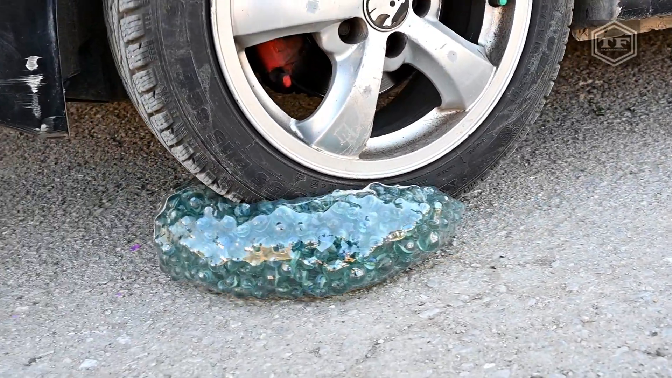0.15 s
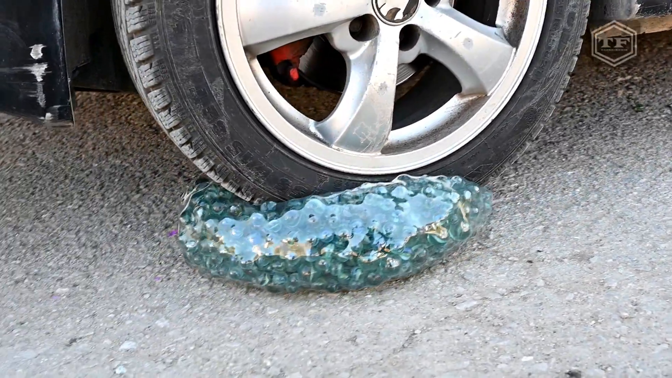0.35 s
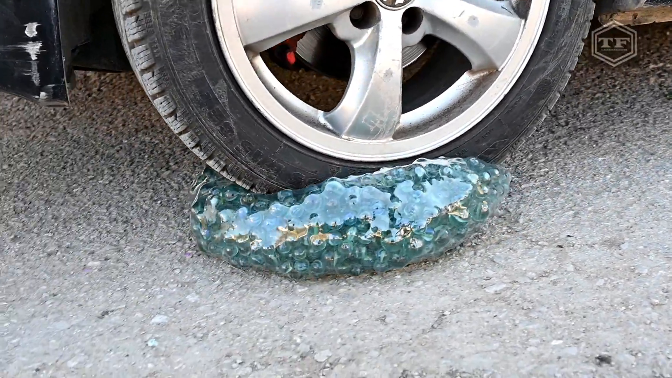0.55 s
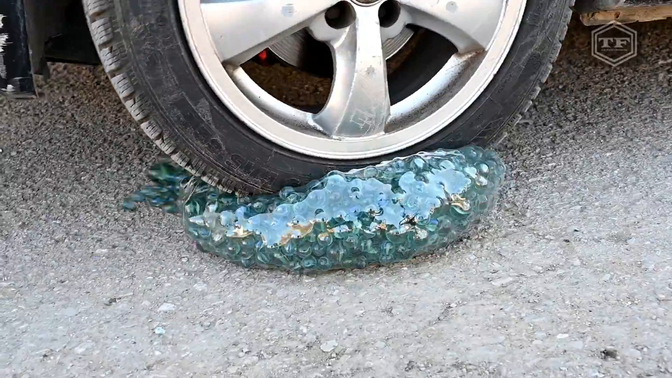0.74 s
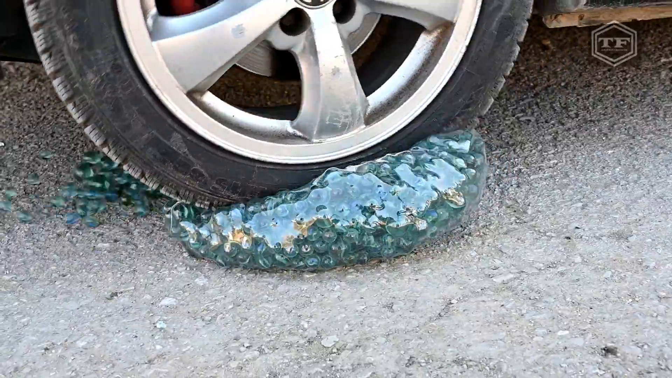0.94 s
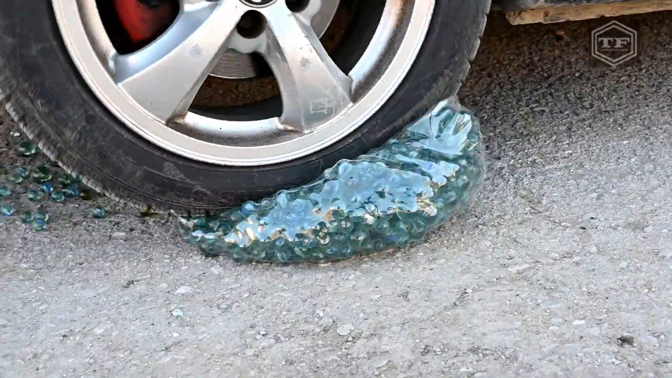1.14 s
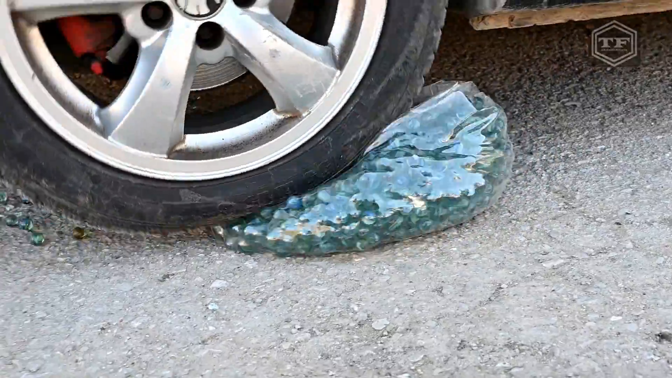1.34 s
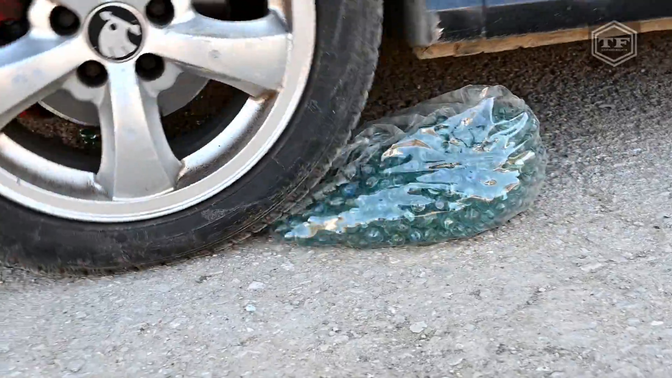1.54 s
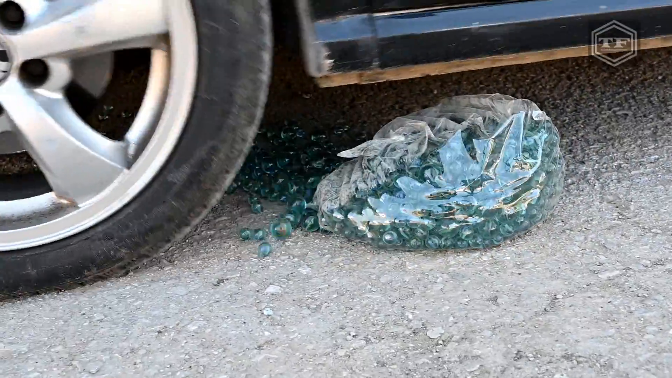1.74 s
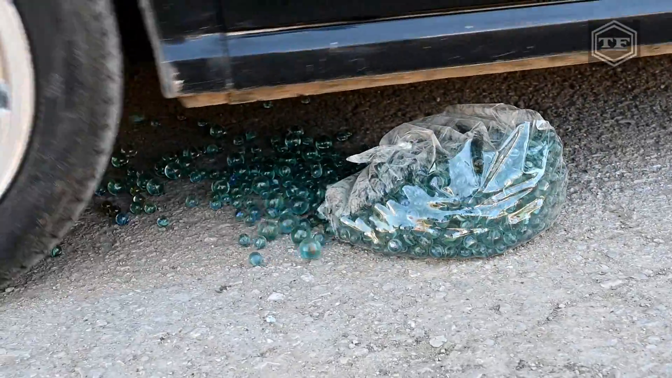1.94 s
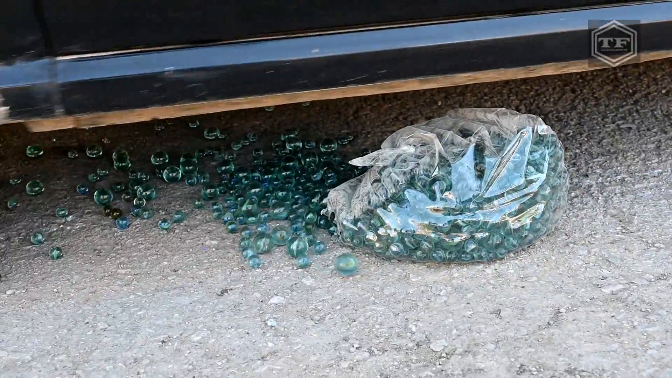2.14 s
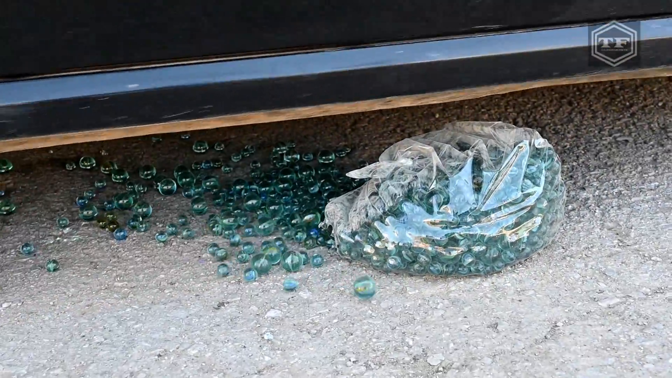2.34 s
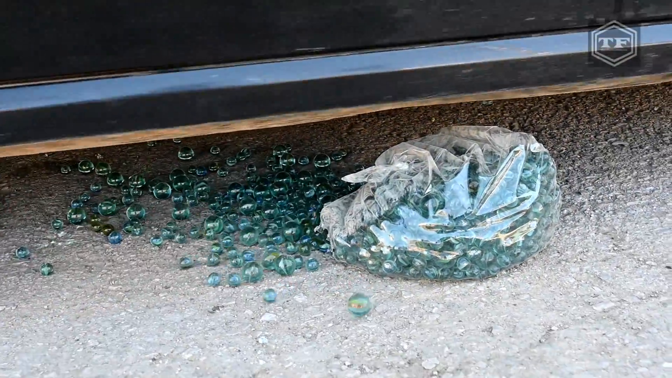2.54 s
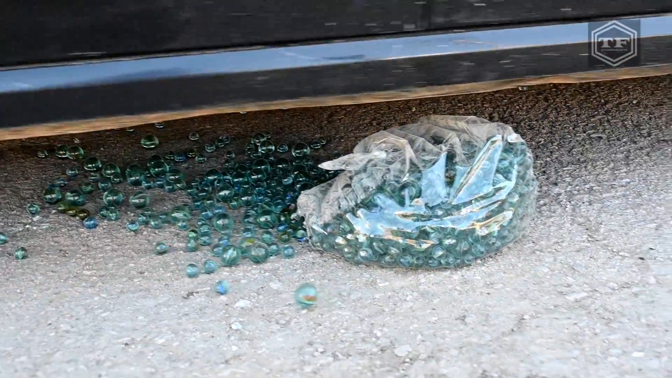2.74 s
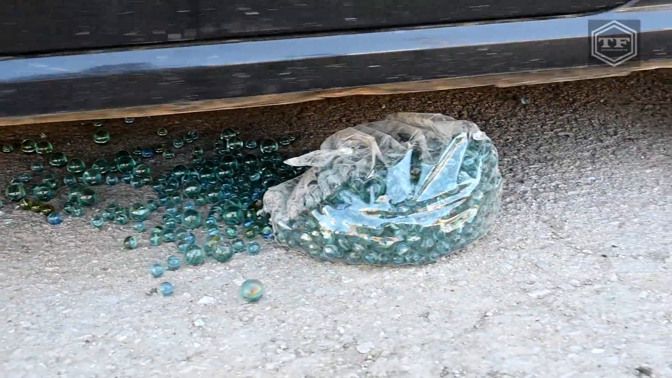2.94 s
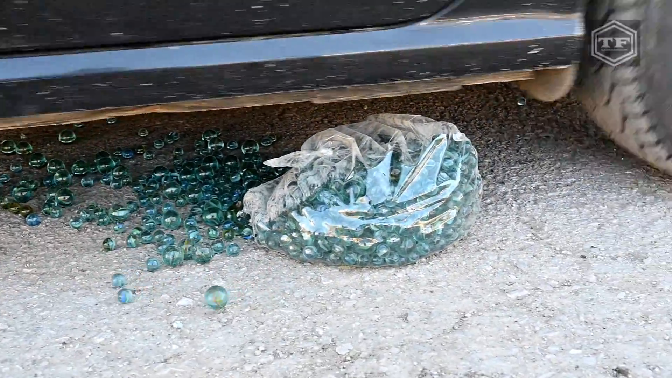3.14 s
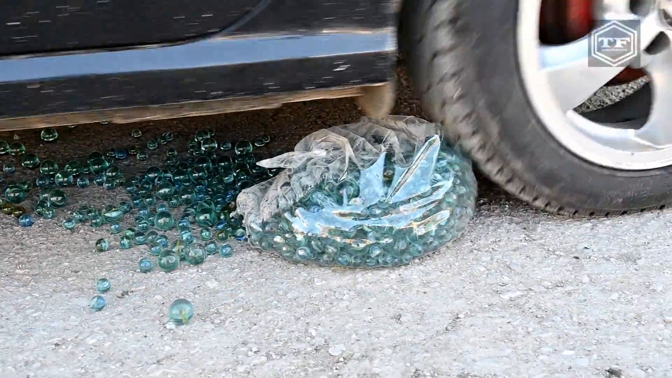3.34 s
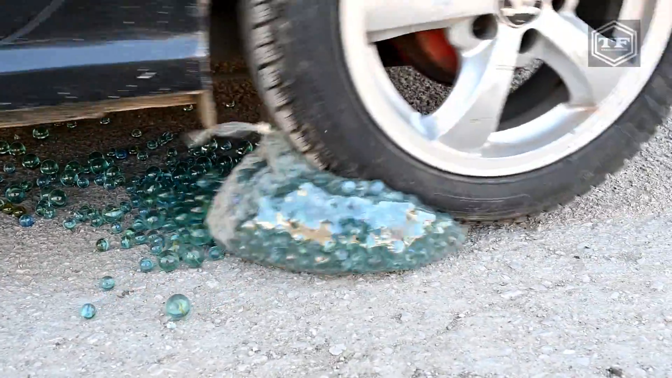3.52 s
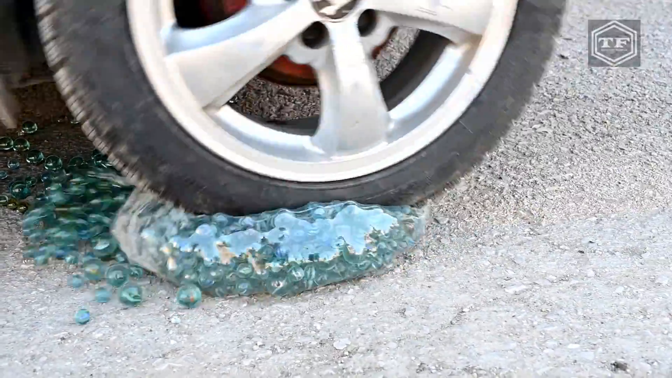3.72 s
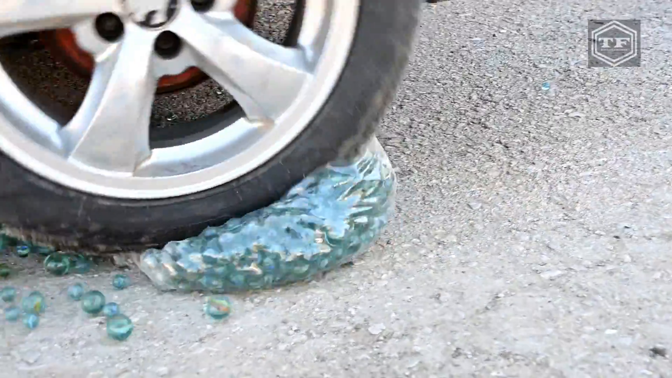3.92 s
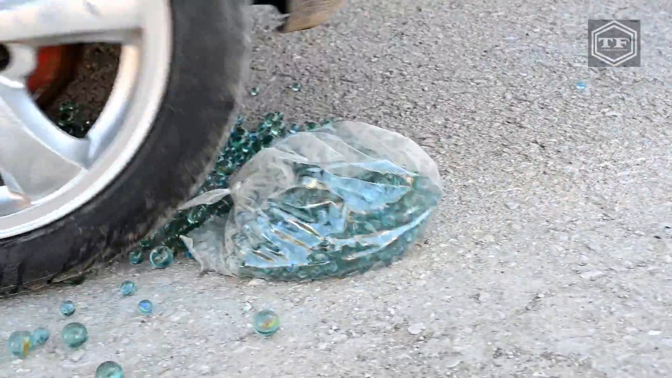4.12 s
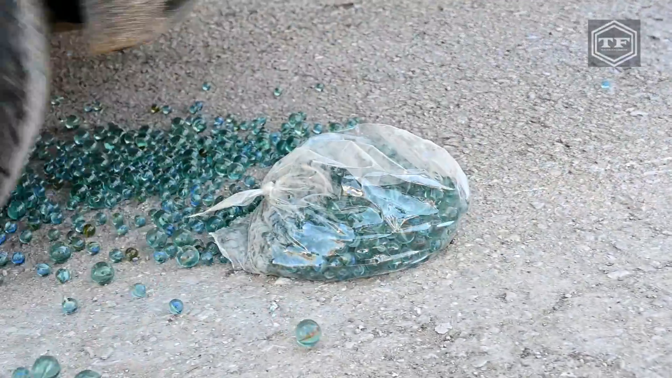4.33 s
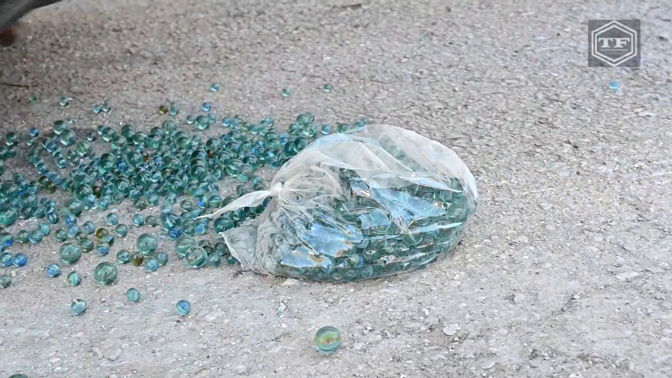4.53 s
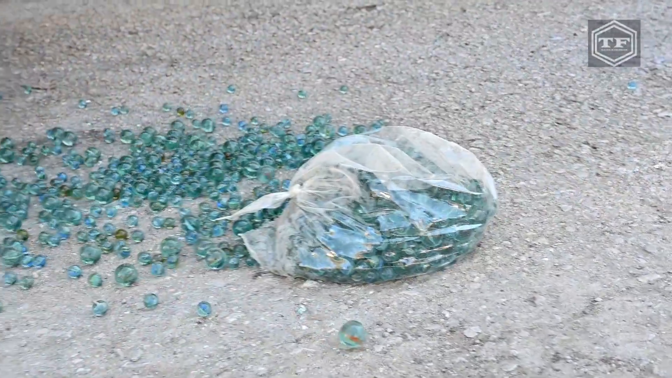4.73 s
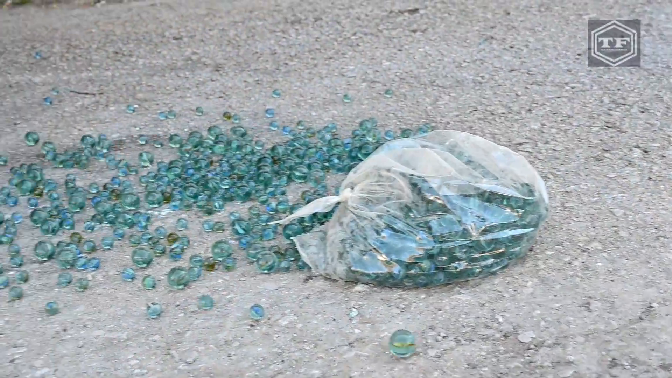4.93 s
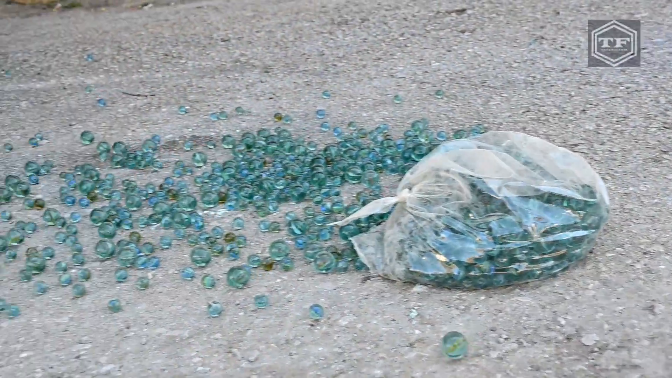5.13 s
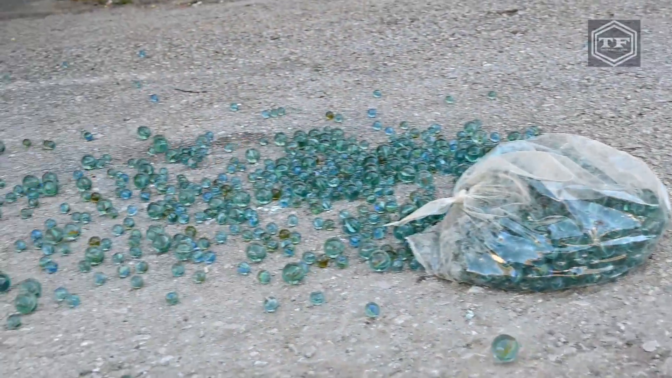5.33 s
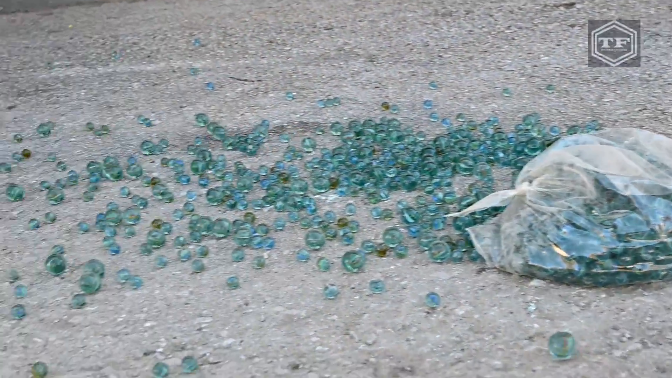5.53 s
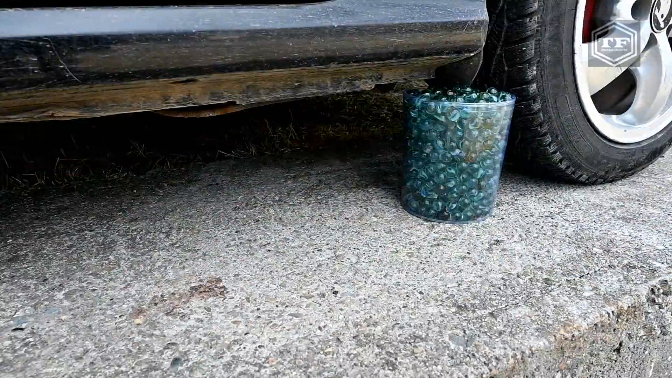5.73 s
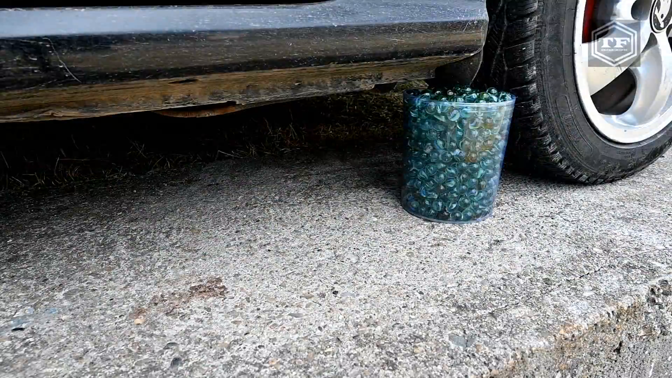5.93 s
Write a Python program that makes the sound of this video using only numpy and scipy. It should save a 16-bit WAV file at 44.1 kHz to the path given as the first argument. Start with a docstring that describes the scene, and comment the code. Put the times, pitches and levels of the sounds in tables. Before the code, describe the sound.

Close on outdoor pavement, a car's front tyre squeezes a bag of glass marbles with rising, uneven clatter and gritty grinding. It bursts into loud cracks, then marbles scatter and roll. After a quieter gap with low engine rumble, the rear tyre crushes it even louder, with distorted peaks and hollow knocks. Loose marbles click and die away, then the level drops to faint air.

```python
"""Car crushing a bag of marbles

A car rolls over a plastic bag of glass marbles on pavement, heard close by: engine rumble is shaped noise plus a hum.
Random impacts make the clatter, grinding and rolling; the front tyre squeezes the pack in slips until marbles spill.
The rear tyre bursts through it, and the loudest peaks clip. Loose marbles click, and decaying tones knock on the car.
The marbles die down, drifting left and then almost all the way back. Near the end the level drops quickly,
leaving faint air noise, a trace of engine rumble and a soft scuff.
"""
import sys
import numpy as np
from scipy import signal
from scipy.fft import rfft, irfft, next_fast_len
from scipy.io import wavfile
from scipy.ndimage import map_coordinates

SR = 44100
rng = np.random.default_rng(int(sys.argv[2]) if len(sys.argv) > 2 else 0)


def output_pcm(signal):
    """Save a mono or channel-first signal as 16-bit PCM at the path in sys.argv[1].

    Samples are clipped to [-1, 1] before scaling.
    """
    pcm = np.clip(np.atleast_2d(signal).T, -1, 1) * 32767
    wavfile.write(sys.argv[1], SR, np.round(pcm).astype(np.int16))


N = 267687
TIME = np.arange(N) / SR  # seconds
TOP_HZ = 15800  # middle of the final treble cutoff
LEVEL_DROP_S = 5.80  # end of the short fade that takes the level down

# All levels in the tables are relative; in the spectra only the shape counts.
# The pack gives way in a rush of contacts: start_s, level_db, grinding_db (added to level_db), t60_s
SLIPS = [(0.1884, -5.5, -13, 0.14), (0.3242, -5.5, -6, 0.15), (0.4394, -3.5, -5, 0.14),
         (0.6184, -1, -7, 0.15), (0.7044, 2, -18.5, 0.62), (0.8564, 7.5, -19, 0.26), (1.058, 6, -23, 0.032),
         (1.1398, -1, -14, 0.04), (1.2925, 8, -8.5, 0.084), (1.334, 2.5, -11.5, 0.099),
         (1.3848, 5.5, -8.5, 0.061), (1.4287, 10.5, -14, 0.13), (1.445, 14, -12, .06),
         (1.466, 3, -13, 0.068), (1.6064, 0, -16.5, 0.35), (1.6654, -4, -20.5, 0.16),
         (2.0113, -9.5, -22, .1), (2.2074, -16, -25, 0.049), (2.278, -11.5, -22, 0.043),
         (2.3025, -16, -25, 0.089), (2.4783, -13.5, -25, 0.047), (2.5574, -16.5, -13, 0.063),
         (2.7282, -22, -18, 0.064), (3.9486, 9.5, -11, 0.1)]
# Single glass clicks, loud and faint, at set times: start_s, level_db, pitch_hz, chatter_t60_s
COLLISIONS = [(0.0753, 3, 3600, 0.0069), (0.605, -4, 6500, .012), (1.1402, 2, 6150, 0.031),
              (1.8785, -0.5, 9200, 0.0076), (2.3365, -11.5, 7500, .035), (2.382, -12, 8040, 0.025),
              (2.5307, -11, 6100, 0.014), (2.6205, -12, 9600, .027), (2.651, -15.5, 7540, 0.028),
              (2.6839, -16.5, 6750, .02), (2.7065, -24, 2000, 0.0082), (2.8505, -28, 9000, 0.033),
              (3.0707, -23.5, 5650, 0.02), (4.4083, 6, 10800, 0.025), (4.9245, -19, 6440, 0.021),
              (5.0085, -20, 6360, 0.0077), (5.2349, -20, 6000, .012), (5.5085, -13, 5470, 0.01),
              (5.5345, -26, 1500, .008), (5.6095, -20, 11000, 0.006), (5.6514, -16.5, 1890, 0.0098),
              (5.7268, -24, 2400, 0.0053), (5.7577, -15.5, 2310, 0.0084), (5.8642, -42, 1310, 0.011)]
# Dull knocks on tyre and underbody: start_s, level_db, centre_hz
KNOCKS = [(1.2971, -10.5, 524), (1.4322, 2, 299), (1.7515, -20, 630), (1.8212, -11, 820),
          (1.8726, -25, 700), (1.9378, -20, 400), (2.0008, -16, 840), (2.0127, -17, 907),
          (2.0973, -22.5, 940), (3.2326, -23, 1010), (3.5995, -2.5, 616), (4.059, 1.5, 339),
          (4.1267, -11.5, 340), (4.3046, -3, 670), (4.4076, -12.5, 1130), (4.4812, -6.5, 904),
          (4.503, -14.5, 300), (6.0233, -36.5, 297)]
# Ringing modes of the car: pitch_hz, level_db, t60_s
CAR_MODES = [(144, 7.5, 0.041), (270.3, -7, 0.17), (479, -1, 0.039), (558, 2, 0.022), (660, -1.5, 0.043),
             (830, -1.5, 0.039), (1026, 6, 0.021), (1215, -4, .03), (2450, 2, .02)]
# A tyre drops as the bag gives way: start_s, cavity_ring_db, thump_db
TYRE_DROPS = [(1.298, -41, -15.5), (1.433, -32, -19), (3.601, -43.5, -14), (4.059, -30.5, -33)]
# Each tyre's crossing, front then rear: bite_s, top_s, leave_s, bite_db, top_db, leave_db (clatter),
# spill_db, spill_dies_db_per_s, spill_treble_db
PASSES = [(-0.01, 0.88, 1.47, -25, -16, -16.5, -17, 24, 2.5),
          (3.423, 3.78, 4.103, -5, -5.5, -12.5, -22, 19, 1.5)]
# Direction of the marbles: time_s, left_ear_lead_samples
DIRECTION = [(4.0, 0.51), (5.2, 5.96), (5.8, 0.76)]
# Engine loudness over time: time_s, level_db
THROTTLE = [(0, -40), (1.6, -39), (2.1, -33.5), (2.6, -43), (2.95, -37.5), (3.4, -37), (4.6, -32),
            (5.7, -45.5)]
# Spectrum of glass on glass: pitch_hz, level_db (per Hz)
GLASS_SPECTRUM = [(820, -40.5), (1400, -2), (1520, -15.5), (1640, -6), (1930, -15.5), (2410, -6.5),
                  (3820, -3), (4490, -4.5), (5710, 1), (7350, -3), (8370, -1), (9930, -5), (11200, -6),
                  (15400, -15)]
# Spectrum of marbles grinding under the tyre: pitch_hz, level_db (per Hz)
GRINDING_SPECTRUM = [(50, -31), (90, -3), (140, -3), (200, -1.5), (240, -1.5), (350, -8), (480, 1.5),
                     (700, -4), (860, 0.5), (1080, -3.5), (1280, -0.5), (1600, -11), (2400, -9.5),
                     (5000, -50)]
# Spectrum of marbles rolling on pavement: pitch_hz, level_db (per Hz)
ROLLING_SPECTRUM = [(100, -4.5), (220, 3.5), (350, -5.5), (480, -1.5), (750, -2), (1000, 1.5), (1270, 1),
                    (1650, -3.5), (3000, -2), (6000, -10), (11000, -21.5), (15500, -17.5)]
# Spectrum of the engine rumble: pitch_hz, level_db (per Hz)
ENGINE_SPECTRUM = [(12, -19), (22, 2), (30, 8.5), (45, -6.5), (60, -6.5), (85, -9), (120, -20.5),
                   (200, -17), (320, -43.5)]
# Spectrum of a tyre rumbling under load: pitch_hz, level_db (per Hz)
TYRE_SPECTRUM = [(15, -12.5), (30, -1.5), (55, 0), (80, 3), (120, -12), (250, -27.5)]
# Spectrum of the outdoor air noise: pitch_hz, level_db (per Hz)
AIR_SPECTRUM = [(25, 1.5), (100, -11), (250, -11.5), (700, -19), (1250, -24), (2500, -30.5), (15000, -42)]

BITE_S, SPILL_RISE_S = 0.009, 0.19  # rise as a tyre bites; rise of the spill before it leaves the pack
RELEASE_DB_PER_S, GRIND_RELEASE_DB_PER_S = 66.5, 108.5  # clatter and grinding once off the pack
GRIND_DB, GRIND_GROWS = -16, 0.59  # grinding at full-scale clatter; its dB per dB of clatter
SPILL_GRIND_DB, TYRE_GRIND_DB = -16, -54.5  # scrape of loose marbles re spill; tyres on bare pavement
PACK_TREBLE_DB, WRAP_TREBLE_DB = -2.5, -7.5  # treble of the pack; change through the whole bag
DULL_DB_PER_S = 3.5  # the spill dulls as it slows
CONTACTS_PER_S, CONTACTS_GROW = 22000, 0.52  # rate at full-scale clatter; its power of clatter strength
ROLL_DB, ROLL_SPILL_DB, ROLL_FOLLOWS = -47.5, -17, 0.55  # grit floor; full-scale spill; dB per dB of spill
FEW_ROLL_DB = -6.5  # the first, smaller spill rolls more quietly
STRAYS_PER_S, STRAY_DB, STRAY_FOLLOWS = 30, 1, 0.77  # level at full-scale clatter; dB per dB of clatter
STRAY_SPREAD_DB, STRAY_HZ, STRAY_CHATTER_S = 5, 7000, 0.036  # scatter in size; usual pitch; chatter t60
STRAY_OCTAVES_PER_DB = 0.09  # strays tick lower as the heap dulls
HEAVE_DB, HEAVE_S = -27, 0.04  # rumble at the peak after one drop; time to that peak


def amp(db):
    """Turn decibels into gain."""
    return 10 ** (np.asarray(db) / 20)


def level_db(gain):
    """Turn gain into decibels."""
    return 20 * np.log10(gain + 1e-6)


def unit(x):
    """Scale to an average (rms) strength of 1."""
    return x / np.sqrt(np.mean(x ** 2) + 1e-20)


def fade(t, t60):
    """Die away by 60 dB in t60 seconds."""
    return np.exp(-np.log(1000) * t / t60)


def along(points, hz):
    """Read a spectrum at any pitch, with pitch on a log axis."""
    f, v = np.transpose(points)
    return np.interp(np.log(hz + 1), np.log(f + 1), v)


def curves(rows):
    """Join each column after the time by straight lines, one value per sample."""
    s, *cols = np.transpose(rows)
    return [np.interp(TIME, s, c) for c in cols]


def wobble(rate):
    """Make a smooth random curve, with rate random points a second."""
    return map_coordinates(rng.standard_normal(4096), [TIME * rate], mode="wrap")


def add(track, s, sound):
    """Mix a sound into a track from time s on, cutting what runs past the end."""
    part = track[..., max(round(s * SR), 0):][..., :sound.shape[-1]]
    part += sound[..., :part.shape[-1]]


def coloured(x, spectrum, size=8192):
    """Give a sound the spectrum's tone without ringing ahead of it; the filter has unit power gain."""
    floored_db = np.maximum(along(spectrum, np.fft.rfftfreq(size, 1 / SR)), -100)
    cepstrum = irfft(np.log(amp(floored_db)))
    # keeping one side of the cepstrum makes the filter respond only after its input
    index = np.arange(size)
    one_sided = 2 * cepstrum * (index < size // 2) * (index > 0)
    response = irfft(np.exp(rfft(one_sided)))
    return signal.fftconvolve(x, response[None] / np.linalg.norm(response), axes=1)[:, :N]


def rush(spectrum, side_db):
    """Make stereo noise whose shared middle has rms near 1 and whose sides differ by side_db."""
    mid, side = coloured(rng.standard_normal((2, N)), spectrum)
    return mid + amp(side_db) * np.array([side, -side])


def contacts(rate, lead, scatter_db, spread):
    """Scatter random impacts of rms near 1; a delay between the ears gives each its own direction."""
    at = np.flatnonzero(rng.random(N) < rate / SR)
    size = unit(amp(scatter_db * np.clip(rng.standard_normal(N), -2, 2))[at])
    size = size * np.sqrt(SR / rate[at])  # rarer impacts are larger
    size = size * np.sign(rng.random(N) - 0.5)[at]
    late = np.rint(lead + spread * rng.standard_normal(N)).astype(int)[at]
    left = np.bincount(at, size, N)
    right = np.bincount(np.clip(at + late, 0, N - 1), size, N)
    return np.array([left, right])


def late_fade(fade_s=0.052):
    """A gain of 1 that falls to 0 in a short straight fade ending at LEVEL_DROP_S."""
    return np.clip((LEVEL_DROP_S - TIME) / fade_s, 0, 1)


def engine(firing_hz=29, hum_db=-12, side_db=-19, floor_db=-59):
    """Low exhaust rumble from shaped noise, with an unsteady firing note near idle."""
    hum_hz = firing_hz * (1 + 0.045 * wobble(5))
    hum = np.sin(2 * np.pi * np.cumsum(hum_hz) / SR)
    loudness = amp(curves(THROTTLE)[0]) * late_fade() + amp(floor_db)
    return loudness * (rush(ENGINE_SPECTRUM, side_db) + amp(hum_db) * hum)


def tyres(load, load_db=-25, load_grows=2.9, lag_s=0.06, side_db=-20):
    """A tyre rumbles as it labours over the pack, and heaves after each drop."""
    # the car's weight follows a moment later
    weight = signal.lfilter([1], [1, -np.exp(-1 / (lag_s * SR))], load)
    labour = amp(load_db) * (weight / weight.max()) ** load_grows
    since = np.maximum(TIME - np.array(TYRE_DROPS)[:, :1], 0) / HEAVE_S
    heave = amp(HEAVE_DB) * np.sum(since * np.exp(1 - since), axis=0)
    return np.hypot(labour, heave) * rush(TYRE_SPECTRUM, side_db)


def outdoor_air():
    """A faint, steady outdoor hush of shaped stereo noise."""
    return amp(-61) * rush(AIR_SPECTRUM, side_db=-4.5)


def crush():
    """Each tyre bites, climbs and leaves the pack; spilt marbles slow down and dull.

    Gives the strengths of clatter, its treble, grinding and spill."""
    power = np.zeros((4, N))
    # the front tyre tears the bag ever wider, letting more treble out
    wrap_db = np.interp(TIME, [0, PASSES[0][2]], [WRAP_TREBLE_DB, 0])
    for bite, top, leave, bite_db, top_db, leave_db, spill_db, dies, bright_db in PASSES:
        load_db = np.interp(TIME, [bite, top, leave], [bite_db, top_db, leave_db])
        touching = np.clip((TIME - bite) / BITE_S, 0, 1)
        after = np.maximum(TIME - leave, 0)
        pack = touching * amp(load_db - RELEASE_DB_PER_S * after)
        spill = np.clip(1 + (TIME - leave) / SPILL_RISE_S, 0, 1) * amp(spill_db - dies * after)
        pack_treble = pack * amp(PACK_TREBLE_DB + wrap_db)
        spill_treble = spill * amp(bright_db - DULL_DB_PER_S * after)
        grind = touching * amp(GRIND_DB + GRIND_GROWS * load_db - GRIND_RELEASE_DB_PER_S * after)
        power += np.square([np.hypot(pack, spill), np.hypot(pack_treble, spill_treble), grind, spill])
    return np.sqrt(power)


def clatter(strength, treble_db, rate, lead, count=10, q=3.0):
    """Glass on glass: each contact rings a tick of a few cycles in one of several pitch bands."""
    ticks = np.zeros((2, N))
    for hz in np.geomspace(1900, 14000, count):
        # octaves above 5500 Hz, where the treble setting acts
        hardness = np.clip(np.log2(hz / 5500), 0, 1.3)
        train = contacts(rate / count, lead, scatter_db=-0.5, spread=0.9)
        train = train * strength * amp(hardness * (treble_db + 4.5))
        ticks += signal.lfilter(*signal.iirpeak(hz, q, SR), train)
    return amp(-2.0) * coloured(ticks, GLASS_SPECTRUM)


def grinding(strength, rate, lead):
    """Loaded marbles scrape and jolt between rubber and pavement as shaped random impacts."""
    jolts = strength * contacts(0.3 * rate, lead, scatter_db=1.0, spread=2.5)
    return amp(1.5) * coloured(jolts, GRINDING_SPECTRUM)


def rolling(spill, lead, grit_rate=3500):
    """Whatever rolls keeps tapping the grit; the rear tyre sets many more marbles rolling."""
    taps = contacts(np.full(N, grit_rate), lead, scatter_db=5.0, spread=4.4)
    crowd_db = np.where(TIME < PASSES[1][0], FEW_ROLL_DB, 0)
    marbles = amp(ROLL_SPILL_DB + crowd_db) * spill ** ROLL_FOLLOWS
    return np.hypot(amp(ROLL_DB), marbles) * coloured(taps, ROLLING_SPECTRUM)


def strays(glass_db, treble_db, octaves=0.22, count=400):
    """Draw chance collisions that follow the heap's loudness and treble, as rows like COLLISIONS."""
    times = np.cumsum(rng.exponential(1 / STRAYS_PER_S, count))
    size, pitch = np.clip(rng.standard_normal((2, count)), -2, 2)
    db = STRAY_DB + STRAY_FOLLOWS * np.interp(times, TIME, glass_db) + STRAY_SPREAD_DB * size
    shift = octaves * pitch + STRAY_OCTAVES_PER_DB * np.interp(times, TIME, treble_db)
    hz = np.minimum(STRAY_HZ * 2 ** shift, TOP_HZ)
    return np.transpose([times, db, hz, np.full(count, STRAY_CHATTER_S)])[times < LEVEL_DROP_S]


def clicks(collisions, lead, cycles=0.56, crack_db=-11, crack_hz=5500, crack_t60=0.003, chatter_db=-11):
    """A single hard tick, with a short chatter of the neighbours that it jostles."""
    out, t = np.zeros((2, N)), TIME[:SR // 20]
    for s, db, hz, chatter_t60 in collisions:
        tick = np.sin(2 * np.pi * hz * t) * np.exp(-t * hz / cycles)
        # the instant of contact adds a burst of noise, softened above crack_hz
        burst = rng.standard_normal(len(t)) * fade(t, crack_t60)
        crack = signal.lfilter(*signal.butter(1, crack_hz, fs=SR), burst)
        tick += amp(crack_db) * np.linalg.norm(tick) * crack
        # so small a body radiates little below its own pitch
        tick = signal.lfilter(*signal.butter(2, hz / 2, "highpass", fs=SR), tick)
        jostle = rng.standard_normal((2, len(t))) * amp(chatter_db) * fade(t, chatter_t60)
        chatter = signal.fftconvolve(jostle, tick[None] / np.linalg.norm(tick), axes=1)
        sound = tick + chatter[:, :len(t)]
        add(out[0], s, amp(db + 4.0) * sound[0])
        add(out[1], s + np.interp(s, TIME, lead) / SR, amp(db + 3) * sound[1])
    return out


def underside(x, t60=0.045, size=2048):
    """A short, dense echo from under the car; its pattern is redrawn every size samples."""
    out, t = np.zeros((2, N)), TIME[:size]
    for start in range(0, N, size):
        tail = rng.standard_normal((2, size)) * fade(t, t60) * (t > 0.0006)
        tail = tail / np.linalg.norm(tail[0])
        add(out, start / SR, signal.fftconvolve(x[:, start:start + size], tail, axes=1))
    return out


def slips(rise_share=0.064, glass_db=-8, ground_db=-6):
    """The pack gives way in sudden rushes: their strength in the glass and on the ground."""
    glass, ground, t = np.zeros(N), np.zeros(N), TIME[:SR // 3]
    for s, db, grind_db, t60 in SLIPS:
        swell = (1 - np.exp(-t / (rise_share * t60))) * fade(t, t60)
        add(glass, s, amp(db + glass_db) * swell)
        add(ground, s, amp(db + ground_db + grind_db) * swell)
    return glass, ground


def knocks(width=0.92, rattle_db=-15, rattle_t60=0.11):
    """Each blow rings the car's damped modes, favouring those near its centre pitch."""
    out, t = np.zeros(N), TIME[:SR // 5]
    hz, level, t60 = np.transpose(CAR_MODES)[:, :, None]
    polarity = (-1) ** (np.arange(len(hz))[:, None] // 2)
    for s, db, centre in KNOCKS:
        # width is in octaves; every blow also varies the modes a little
        nearness = np.exp(-0.5 * (np.log2(hz / centre) / width) ** 2)
        weight = amp(level + rng.normal(0, 4.5, hz.shape)) * nearness
        pitch = hz * np.exp(rng.normal(0, 0.024, hz.shape))
        modes = polarity * weight * np.sin(2 * np.pi * pitch * t) * fade(t, t60)
        ring = np.sum(modes, axis=0)
        ring = ring / np.abs(ring).max()
        # loose panels rattle on briefly after the blow
        shaking = rng.standard_normal(len(t)) * fade(t, rattle_t60)
        rattle = signal.fftconvolve(shaking, ring / np.linalg.norm(ring))[:len(t)]
        add(out, s, amp(db + 1.0) * (ring + amp(rattle_db) * rattle))
    return out


def drops(cavity_hz=248, cavity_t60=2.2, thump_hz=150, thump_t60=0.13):
    """A landing tyre thumps, and the ring of air inside it hums on."""
    out, t = np.zeros(N), TIME[:2 * SR]
    for s, cavity_db, thump_db in TYRE_DROPS:
        phase = 2 * np.pi * cavity_hz * t + 0.75 * wobble(25)[:len(t)]
        cavity = np.sin(phase) * fade(t, cavity_t60)
        thump = np.sin(2 * np.pi * thump_hz * t) * fade(t, thump_t60)
        add(out, s, amp(cavity_db + 0.5) * cavity + amp(thump_db) * thump)
    return out


def scuff(s=6.023, db=-45, t60=0.18):
    """A soft, dull scuff near the end: a fading burst of shaped noise."""
    swell = (TIME > s) * fade(np.abs(TIME - s), t60)
    return amp(db) * swell * rush(AIR_SPECTRUM, side_db=-6)


def scene():
    """The load on the heap drives clatter and grinding together, in uneven surges."""
    heap, treble, grind, spill = crush()
    glass_db, treble_db = level_db(heap), level_db(treble / heap)
    lead = curves(DIRECTION)[0]
    scrape = np.hypot(np.hypot(grind, amp(SPILL_GRIND_DB) * spill), amp(TYRE_GRIND_DB))
    rate = np.maximum(CONTACTS_PER_S * heap ** CONTACTS_GROW, 100)
    glass_slip, ground_slip = slips()
    # the fewer marbles move, the more their contacts come in clumps
    clumping = (5000 / rate) ** 0.25
    surge_db = 1.6 * clumping * (wobble(150) + 0.61 * wobble(40))
    glass = clatter(np.hypot(heap * amp(surge_db), glass_slip), treble_db, rate, lead)
    ground = grinding(np.hypot(scrape * amp(0.43 * surge_db), ground_slip), rate, lead)
    glass = late_fade() * glass + clicks([*COLLISIONS, *strays(glass_db, treble_db)], lead)
    ground = late_fade() * (ground + rolling(spill, lead)) + knocks()
    marbles = glass + ground + underside(amp(-6.5) * glass + amp(-21.5) * ground)
    background = engine() + tyres(grind) + scuff() + outdoor_air()
    balance = amp([[0.3], [-0.3]])  # left a touch louder than right
    return marbles * balance + drops() + background


def record(dry):
    """Clip at full scale, then remove the treble above a 300 Hz wide slope around TOP_HZ."""
    clipped = np.clip(dry, -1, 1)
    m = next_fast_len(N + SR // 2)
    passed = np.clip((TOP_HZ - np.fft.rfftfreq(m, 1 / SR)) / 300 + 0.5, 0, 1)
    return irfft(rfft(clipped, m) * passed, m)[:, :N]


dry = scene()
out = record(dry)
output_pcm(out)
```